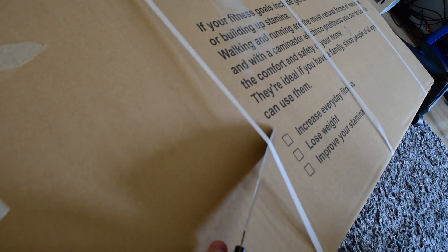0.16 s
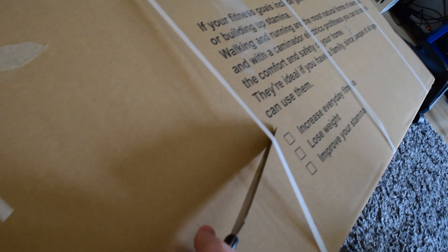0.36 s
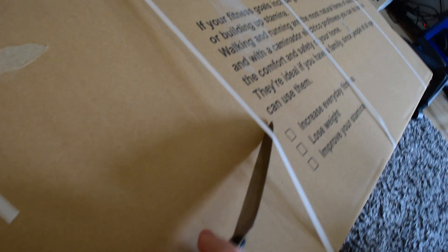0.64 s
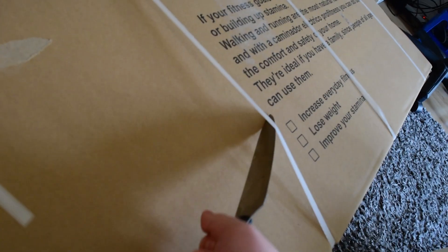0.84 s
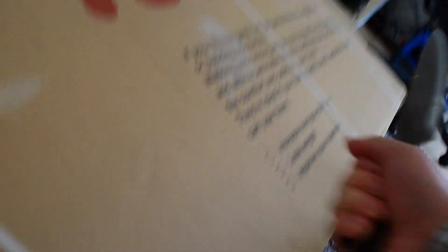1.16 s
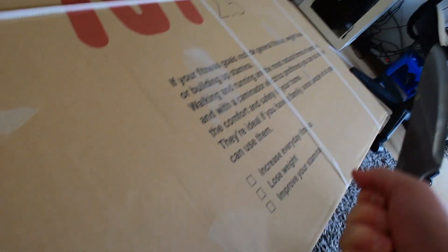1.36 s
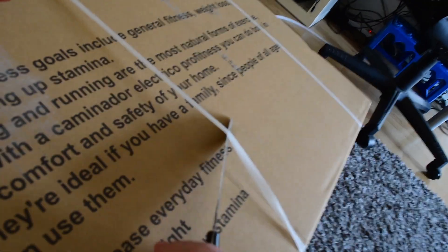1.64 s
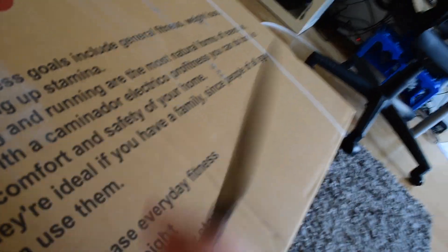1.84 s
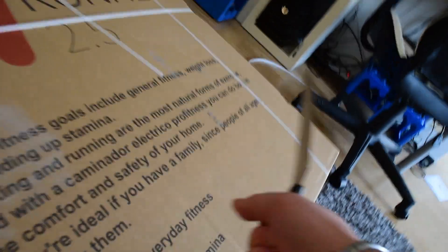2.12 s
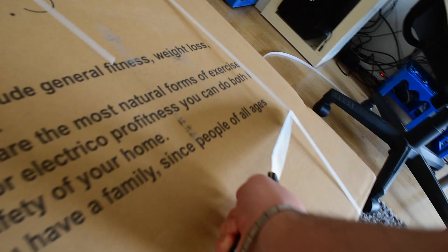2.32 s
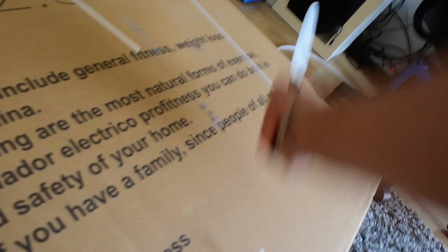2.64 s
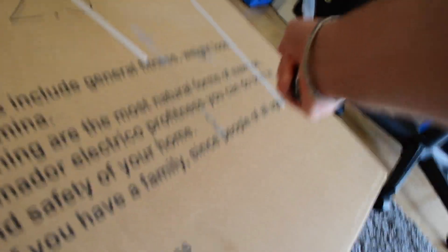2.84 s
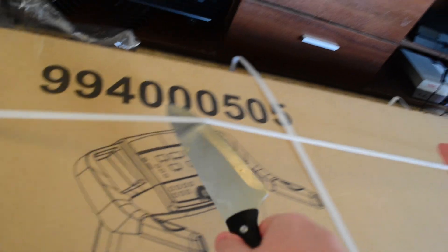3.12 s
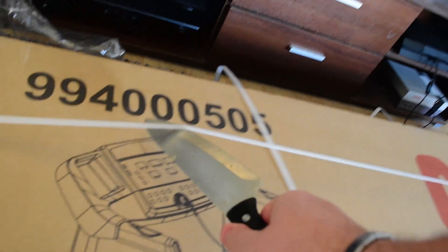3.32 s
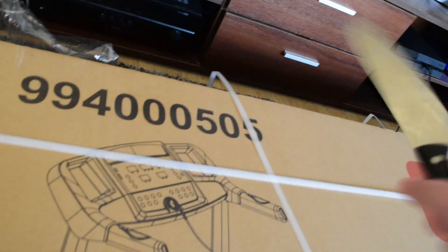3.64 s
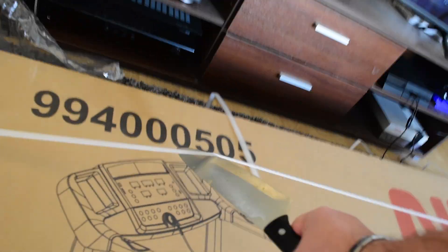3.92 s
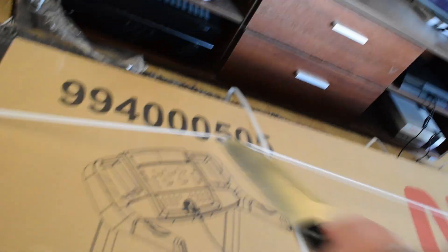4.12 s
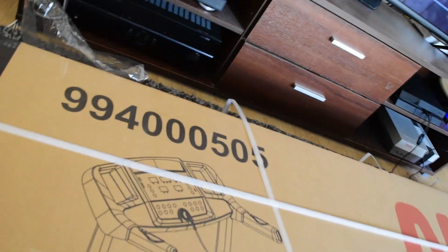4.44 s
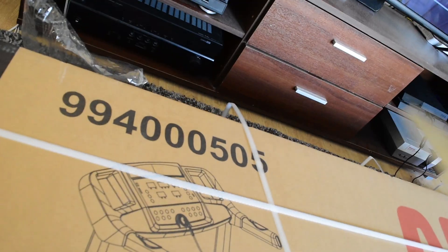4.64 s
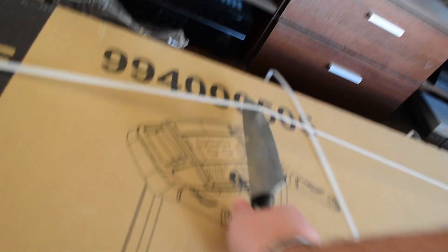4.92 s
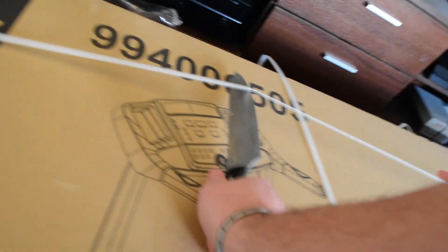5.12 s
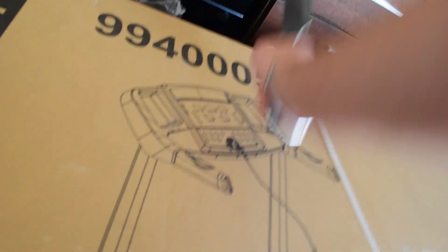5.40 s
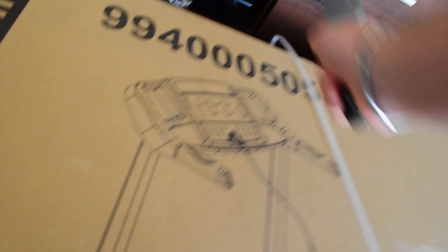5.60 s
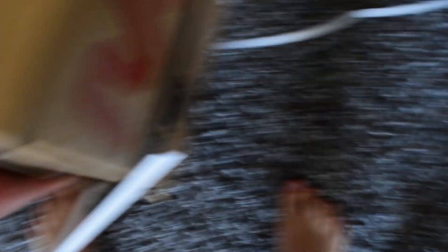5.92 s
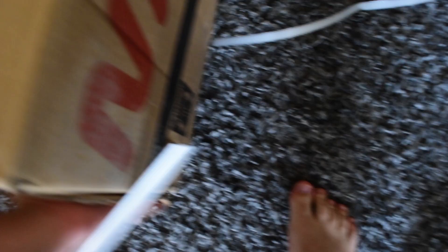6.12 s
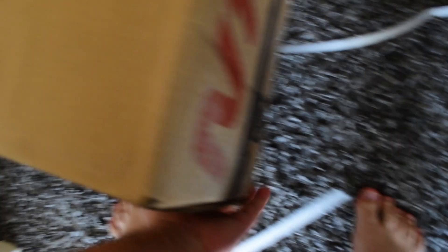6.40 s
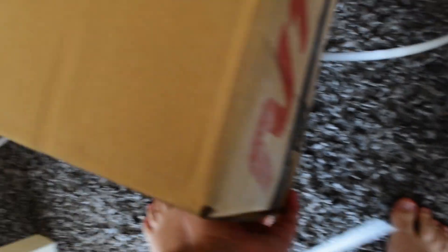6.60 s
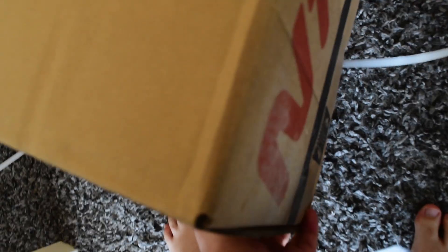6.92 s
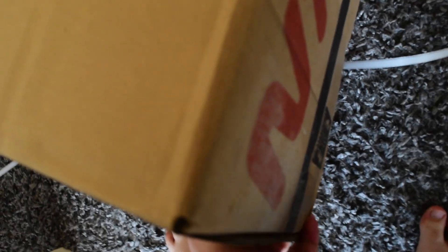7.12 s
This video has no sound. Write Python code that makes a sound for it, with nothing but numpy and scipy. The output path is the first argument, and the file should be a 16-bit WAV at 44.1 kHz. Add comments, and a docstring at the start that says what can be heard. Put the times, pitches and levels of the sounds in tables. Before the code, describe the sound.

A close microphone in a furnished room, over a faint low background, hears a knife working under tight plastic straps on a large cardboard box. From 0 to 0.95 s the blade creaks and rasps softly, with tiny ticks and a short strap hum. At 0.98 s a strap bursts: bright crack, whipping hiss and hollow drumming. Brief scrapes lead to thuds at 1.76 and a sharp snap at 1.85. Creaking resumes around 2.25, then a double crack at 2.6 with a faint steely ring. After a quieter gap, scraping at 3.4 leads to a hard snap at 3.55, and another pair at 4.13-4.2. Around 4.9-5.6 the earlier scrape, thuds and snap recur, at about 5.25. A dull handling thump comes near 6.1; from 5.9 to the end, loose strap rustles and scrapes unevenly over cardboard, with small knocks around 7.05 and 7.2.

```python
"""Cutting straps off a cardboard box

A knife is worked under tight plastic straps on a big cardboard box. The blade scrapes and ticks, made of shaped
noise and irregular slips; straps or panels hum briefly. Each bursting strap cracks, whips and drums the box, whose
panels are a bank of resonances. Loose strap is dragged away, a furnished room answers with dying noise, and a
close microphone with a fast compressor picks it all up. One cut is spliced in a second time."""
import sys
import numpy as np
from scipy import signal
from scipy.fft import rfft, irfft, next_fast_len
from scipy.io import wavfile

SR = 44100
rng = np.random.default_rng(int(sys.argv[2]) if len(sys.argv) > 2 else 0)


def voltage_ratio(decibels):
    """Convert decibels (scalar or array-like) to amplitude ratios, 20 dB per decade."""
    exponent = np.asarray(decibels, float) / 20
    return 10 ** exponent


def pcm_store(signal):
    """Save signal as 16-bit PCM."""
    levels = np.round(np.clip(np.atleast_2d(signal), -1, 1) * 32767)
    wavfile.write(sys.argv[1], SR, levels.astype(np.int16).T)


N = 320166  # length of the scene in samples

# colour of a sharp crack or tick: (frequency [Hz], level [dB per Hz])
CRACK_COLOUR = [(290, -40.5), (500, -4), (4340, 2.5), (5710, -1), (8090, 1.5), (10500, -6), (13400, -3),
                (16000, -8.5)]


def unit(x):
    """Scale to rms 1."""
    return x / np.sqrt(np.mean(x ** 2) + 1e-20)


def along(points, hz):
    """Read a curve of (frequency [Hz], value) points on a log frequency axis."""
    f, v = np.transpose(points)
    return np.interp(np.log(hz + 1), np.log(f + 1), v)


def filtered(x, response):
    """Multiply the spectrum of x by a response, given as a function of frequency."""
    m = next_fast_len(len(x) + 8192)
    hz = np.fft.rfftfreq(m, 1 / SR)
    return irfft(rfft(x, m) * response(hz), m)[:len(x)]


def noise(colour, size, tilt_db=0):
    """Coloured noise of rms 1; a positive tilt_db makes it brighter, a negative one duller."""
    def response(hz):
        return voltage_ratio(along(colour, hz) + tilt_db * np.log2(hz / 2000 + 0.048))
    return unit(filtered(rng.standard_normal(size), response))


def add(out, start, x):
    """Mix x in at start seconds."""
    out[round(start * SR):][:len(x)] += x


def slips(rate, spread_db, size=N):
    """Stick-slip: sudden small releases at random moments, about rate per second, of uneven size."""
    hit = rng.random(size) < rate / SR
    strength = voltage_ratio(spread_db * np.minimum(rng.exponential(size=size), 3))
    return hit * strength * rng.choice([-1, 1], size)


def grit(rate, spread_db, life, share, size=N):
    """Envelope of rms 1: steady contact plus short spurts that fade after each slip, over life seconds."""
    pole = np.exp(-1 / (life * SR))
    spurts = signal.lfilter([1], [1, -pole], abs(slips(rate, spread_db, size)))
    return unit(1 + share * unit(spurts))


def friction(levels, body, rasp_colour, fizz_colour, rough):
    """A low body sound; the same rough contact hisses in a mid band and crackles in a high band."""
    low, mid, high = levels
    rasp = unit(rough ** 0.96) * noise(rasp_colour, N)
    fizz = rough * noise(fizz_colour, N)
    return low * unit(body) + mid * rasp + high * fizz


def box(x):
    """The cardboard panels ring at their resonances."""
    # (pitch [Hz], width [Hz], level [dB])
    panels = [(65, 52, -1), (111, 170, -6.5), (115.6, 15, 6.5), (188, 100, -4), (284.4, 57, 1.5),
              (330, 38, 2.5), (404, 92, -5.5), (540, 76, -6), (663, 90, -10), (1130, 345, -31.5)]

    def response(hz):
        total = 0
        for k, (centre, width, db) in enumerate(panels):
            damping = 1j * hz * width
            sign = (-1) ** k  # every second resonance is flipped
            total = total + sign * voltage_ratio(db) * damping / (centre ** 2 - hz ** 2 + damping)
        return total
    return filtered(x, response)


def quiet_air():
    """The faint steady background: coloured noise at one level."""
    # (frequency [Hz], level [dB per Hz])
    colour = [(47, -33.5), (80, -11.5), (123, 2), (270, -11.5), (522, -17), (682, -29), (1260, -25.5),
              (3000, -34), (11000, -42), (14300, -74.5), (22000, -120)]
    return voltage_ratio(-53.5) * noise(colour, N)


def handling():
    """Low rumble of handling: deep noise whose level swells and sinks."""
    # level of the rumble: (time [s], level [dB])
    levels = [
        [(0, -53), (1.1, -37.5), (1.45, -44), (2.79, -41), (3.27, -47.5), (4.23, -34), (4.7, -50), (5.64, -49),
         (6.104, -24), (6.3, -45.5), (7.26, -32)],
    ][0]
    # (frequency [Hz], level [dB per Hz])
    colour = [(15, -51), (25, 7), (45, 9), (70, 0), (110, -18.5), (300, -102)]
    level_db = np.interp(np.arange(N) / SR, *np.transpose(levels))
    return voltage_ratio(level_db) * noise(colour, N)


def swell(start, length, db, peak, fall_db, release_s, attack_s=0.024):
    """Gain of one stroke: a quick start, an arch in dB with its top at the share peak, then a dying tail."""
    t = np.arange(N) / SR - start
    u = np.clip(t / length, 0, 1) - peak
    away = np.where(u < 0, -u / peak, u / (1 - peak))  # 0 at the top of the arch, 1 at either end
    tail_db = -60 * np.maximum(t - length, 0) / release_s
    return np.clip(1 + t / attack_s, 0, 1) * voltage_ratio(db - fall_db * away ** 2 + tail_db)


def stroking():
    """Gains of creak, rasp and fizz over all blade strokes; the fizz stops soon after the blade."""
    # blade strokes under the strap:
    # (start [s], length [s], creak level [dB], hiss level [dB], fizz level over the hiss [dB])
    strokes = [(-0.04, 0.064, -26.5, -44, -12), (0.182, 0.44, -29, -47.5, -6.5),
               (0.46, 0.21, -43, -44.5, -5), (0.729, 0.115, -42, -46, -4.5), (0.84, 0.14, -37, -46.5, -8),
               (1.382, 0.052, -35.5, -39, -6), (1.507, 0.12, -36, -45, -4.5),
               (1.656, 0.26, -47, -55.5, 5.5), (2.25, 0.19, -36.5, -41.5, -10.5),
               (2.52, 0.047, -30.5, -38.5, -7.5), (2.932, 0.11, -49.5, -54.5, 2),
               (3.184, 0.11, -56, -66.5, -19), (3.399, 0.13, -33.5, -42.5, -17.5),
               (3.539, 0.027, -21.5, -26, -5), (3.881, 0.25, -33, -40.5, -19),
               (4.802, 0.087, -47.5, -60, -8), (5.637, 0.41, -46.5, -53, -5)]
    linger_s, fizz_stop_s = 0.44, 0.05  # time to die by 60 dB once the blade stops
    total = np.zeros((3, N))
    for start, length, creak_db, hiss_db, bright_db in strokes:
        total[0] += swell(start, length, creak_db, 0.18, 9.5, linger_s)
        total[1] += swell(start, length, hiss_db, 0.56, 9, linger_s)
        total[2] += swell(start, length, hiss_db + bright_db, 0.92, 8.5, fizz_stop_s)
    return total


def short_hums(rate, life):
    """Short hums of a strap, taut or dragged, or of the box panel; each sinks slightly in pitch."""
    # (start [s], length [s], level [dB], middle pitch [Hz])
    hums = [(-0.04, 0.083, -37, 300), (0.191, 0.47, -30, 322), (0.746, 0.22, -54, 330),
            (1.483, 0.13, -29.5, 325), (2.277, 0.15, -25.5, 341), (2.532, 0.05, -25.5, 390),
            (3.424, 0.089, -26, 126.3), (3.892, 0.1, -27.5, 123), (4.129, 0.017, -13.5, 565),
            (5.836, 0.032, -28.5, 150), (6.243, 0.067, -44, 462), (6.613, 0.56, -41.5, 420.5),
            (7.058, 0.2, -39.5, 440)]
    sag = 0.07  # share of the pitch lost over each hum
    knots, level = [], np.zeros(N)
    for start, length, db, hz in hums:
        knots.append((start, hz * (1 + sag * 0.5)))
        knots.append((start + length, hz * (1 - sag * 0.5)))
        level += swell(start, length, db, peak=0.15, fall_db=5.5, release_s=0.16, attack_s=0.0037)
    pitch = np.interp(np.arange(N) / SR, *np.transpose(knots))
    turn = np.exp(2j * np.pi * np.cumsum(pitch) / SR)
    pole = np.exp(-1 / (life * SR))
    fade = np.convolve([1, -pole], [1, -pole ** 4])  # each random kick rises fast and dies over life seconds
    swing = signal.lfilter([1], fade, slips(rate, 3.1) * turn.conj())
    return level * unit((swing * turn).imag)


def blade_rub():
    """The blade rubs under the strap: slips creak through the box and rough contact hisses and crackles."""
    # rasp and fizz: (frequency [Hz], level [dB per Hz])
    rasp_colour = [(500, -28), (800, 0), (1360, 0), (1750, -5), (2400, -3), (3300, -15.5), (4300, -10),
                   (5000, -19.5), (7000, -57.5)]
    fizz_colour = [(4500, -33), (5500, -8), (6400, -3), (7400, -5.5), (8300, -5.5), (10000, -10.5),
                   (11500, -16), (12800, -12.5), (16000, -15.5)]
    teeth = grit(70, 3, 0.0015, 0.45)
    creak = box(slips(400, 7.3))
    return friction(stroking(), creak, rasp_colour, fizz_colour, teeth)


def taps():
    """Each contact: a short tick, a dull crunch of card and a push into the box."""
    # blade and strap contacts:
    # (time [s], tick level [dB], knock level [dB], knock pitch [Hz], tick brightness [dB per octave])
    contacts = [(0.2227, -47, -18, 346, 3), (0.3696, -37, -19.5, 313, 1), (0.3944, -30.5, -12.5, 308, -0.5),
                (0.5092, -38, -21, 390, 9), (0.9762, -2, -6, 151.8, -1.5), (1.1053, -15.5, -19, 340, 2),
                (1.3709, -11.5, -13, 1704, -5.5), (1.634, -42, -58, 339, 7.5), (1.7192, -30, -64.5, 345, 9),
                (1.7607, -6.5, 5, 218, -4.5), (1.8028, -17, -0.5, 153, 1.5),
                (1.8126, -20.5, -7.5, 148, 2.5), (1.8327, -8, -11.5, 273, 6.5), (1.8595, 9, -7, 492, 3.5),
                (2.2436, -25, -36.5, 242, -1.5), (2.2695, -25.5, -22, 343, 2), (2.3245, -18, -22, 289, -3),
                (2.3351, -16, -21, 318, -2), (2.396, -20.5, -11.5, 304, -3.5), (2.52, -18, -21, 370, -7),
                (2.577, -5.5, -7.5, 170, -3.5), (2.5987, -5, -2, 1610, -4), (2.617, -6, 2, 233, 0),
                (2.9285, -27.5, -36, 164, 1.5), (2.9527, -33, -39, 345, 2), (2.9786, -31.5, -41, 215, 3),
                (3.4201, -9, -17.5, 147.4, -9.5), (3.4625, -23, -9.5, 519, 2),
                (3.4995, -21.5, -18.5, 152, 2), (3.5569, 6.5, 1, 321.6, 1.5), (3.89, -38, -28, 595, -2),
                (3.9401, -34, -23.5, 720, -5), (4.132, -1.5, -4.5, 553, 5),
                (4.162, -11.5, -15.5, 146.7, -5), (4.2035, 9, -16.5, 352, 0), (5.6458, -24, -27, 248, 0.5),
                (5.7022, -32.5, -29.5, 222, -3), (5.8394, -37, -23, 143, -1), (6.2915, -20, -21.5, 453, 21),
                (6.4286, -25.5, -35.5, 233, 21), (7.0187, -24.5, -25, 4450, 1), (7.062, -18, -12, 191, -7),
                (7.073, -15, -12.5, 395, -5), (7.076, -30, -12, 110.7, -5), (7.2059, -24, -36, 468, -4),
                (7.2268, -14.5, -18, 1660, -8), (7.246, -37, -47, 400, -2)]
    # colour of the crunch: (frequency [Hz], level [dB per Hz])
    thud = [(60, -25), (150, 4.5), (400, 0.5), (1200, -12.5), (3000, -23.5), (8000, -71.5)]
    out, push, t = np.zeros(N + SR), np.zeros(N + SR), np.arange(SR // 5) / SR
    for start, tick_db, knock_db, hz, tilt_db in contacts:
        tick = voltage_ratio(tick_db - 60 * t / 0.022) * (1 - np.exp(-t / 0.0014))
        tick = tick * noise(CRACK_COLOUR, len(t), tilt_db)
        crunch = voltage_ratio(knock_db - 60 * t / 0.05) * (1 - np.exp(-t / 0.0063)) * noise(thud, len(t))
        spring_s = 4 / hz + 0.02  # the struck spot gives and springs back
        dent = voltage_ratio(knock_db + 6.5 - 60 * t / spring_s) * np.sin(2 * np.pi * hz * t)
        add(out, start, tick + crunch + 0.48 * dent)
        add(push, start, dent)
    return out[:N] + 0.36 * box(push[:N])


def bursts():
    """A crack, then the freed strap lashes the box: hiss, drumming and a sizzle that stops when the end lies still."""
    # straps bursting or slipping loose:
    # (time [s], crack level [dB], whip level [dB], drum level [dB], sizzle level [dB], lashing time [s])
    loose = [(0.9777, 8, -6.5, -5.5, -29, 0.12), (1.8514, -3, -6.5, -8.5, -28.5, 0.074),
             (2.5787, -16, -27, -11.5, -42, 0.049), (2.599, 1, -10, -17.5, -33.5, 0.073),
             (3.551, 0.5, -6.5, -15, -23, 0.08), (4.133, -12, -18, -11, -34.5, 0.087),
             (4.1973, 0, -4.5, -12.5, -20.5, 0.087)]
    # whip, sizzle, and boom of the whole box breathing: (frequency [Hz], level [dB per Hz])
    whip_colour = [(240, -8.5), (400, 5), (579, -1.5), (1090, 3), (3020, -7), (4440, -6.5), (7280, -12),
                   (11000, -55.5), (15000, -78.5), (16000, -62)]
    sizzle_colour = [(1500, -31.5), (4000, -6), (8000, -0.5), (12000, -6.5), (15500, -6.5), (16500, -30)]
    boom_colour = [(35, -30), (60, -7.5), (90, -1), (122, 0), (150, -15.5), (300, -64)]
    out, t = np.zeros(N + SR), np.arange(SR // 2) / SR
    size = len(t)
    for start, crack_db, whip_db, drum_db, sizzle_db, lash_s in loose:
        crack = voltage_ratio(crack_db + 5 - 60 * t / 0.0092) * (1 - np.exp(-t / 0.0019))
        crack = crack * noise(CRACK_COLOUR, size)
        whip = voltage_ratio(whip_db) * grit(80, 4.6, 0.0037, 0.27, size) * noise(whip_colour, size)
        dull = filtered(whip, lambda hz: 1 / (1 + (hz / 5000) ** 4))
        whip = dull + voltage_ratio(-60 * t / 0.5) * (whip - dull)  # its treble dies first
        panels = unit(box(slips(500, 4.9, size)))
        drum = voltage_ratio(drum_db) * (panels + 0.73 * noise(boom_colour, size))
        sizzle = voltage_ratio(sizzle_db) * grit(370, 4.3, 0.0017, 0.9, size) * noise(sizzle_colour, size)
        sizzle = sizzle / (1 + np.exp((t - lash_s) / 0.013))
        fade = voltage_ratio(-60 * t / 0.35) * (1 - np.exp(-t / 0.012))
        add(out, start, crack + fade * (whip + drum) + sizzle)
    return out[:N]


def clinks():
    """The steel blade rings faintly at its own pitches when it is flicked."""
    # flicks of the blade: (time [s], level [dB])
    flicks = [(2.6003, -33), (3.4182, -40), (3.4632, -43.5), (3.502, -41), (3.5565, -21.5)]
    # steel ringing: (pitch [Hz], level [dB], time to die by 60 dB [s])
    steel = [(7260, -3, 0.06), (8400, 0.5, 0.053), (9730, -4, 0.07)]
    out, t = np.zeros(N + SR), np.arange(SR // 5) / SR
    scatter_db = rng.normal(0, 2, (len(flicks), len(steel)))  # no two flicks ring quite alike
    for (start, db), chances in zip(flicks, scatter_db):
        for (hz, mode_db, t60), chance_db in zip(steel, chances):
            level = voltage_ratio(db + mode_db + chance_db - 60 * t / t60)
            add(out, start, level * np.sin(2 * np.pi * hz * t))
    return out[:N]


def pulling():
    """Gains of body, rasp and fizz of the dragged strap: harder pulls are brighter."""
    # strength of the pull on the strap: (time [s], level [dB])
    pulls = [
        [(5.87, -52), (5.914, -37.5), (6.026, -35), (6.144, -42), (6.19, -36), (6.238, -48), (6.296, -38.5),
         (6.354, -50), (6.52, -52), (6.572, -39.5), (6.65, -41.5), (6.834, -36.5), (6.904, -41.5),
         (7.09, -40.5), (7.15, -47.5), (7.21, -42), (7.26, -42.5)],
    ][0]
    t = np.arange(N) / SR
    db = np.interp(t, *np.transpose(pulls))
    inside = np.minimum(t - pulls[0][0], pulls[-1][0] - t)
    on = np.clip(1 + inside / 0.015, 0, 1)  # fades in and out at the ends
    over_db = db + 40  # above a firm pull of -40 dB
    return on * voltage_ratio([-36.5 + 0.89 * over_db, db, -43.5 + 1.5 * over_db])


def strap_drag():
    """Loose strap dragged over cardboard: uneven pressure shapes a low body, a rasp and a fizz."""
    # body, rasp and fizz: (frequency [Hz], level [dB per Hz])
    body_colour = [(47, -24), (80, -3.5), (156, -4), (200, -10), (235, -5), (302, -15), (396, -8),
                   (800, -20.5), (1040, -20.5), (1760, -120)]
    rasp_colour = [(410, -19), (700, -5), (1310, 10), (1430, 8.5), (2200, 5.5), (3680, 4.5), (4800, 5),
                   (6240, -14), (10600, -120)]
    fizz_colour = [(2820, -2), (4800, 7), (5610, 10), (7400, 9.5), (10200, 3.5), (11200, 2), (12100, 7),
                   (13500, 1), (15100, 1.5), (16000, -39)]
    lumps = grit(60, 3, 0.015, 0.4)  # uneven pressure along the strap
    rough = unit(lumps * grit(200, 4.7, 0.0022, 0.25))
    return friction(pulling(), lumps * noise(body_colour, N), rasp_colour, fizz_colour, rough)


def room(x):
    """Reverberation dying band by band, with a new pattern every third of a second."""
    # (frequency [Hz], time to die by 60 dB [s])
    decay = [(100, 0.55), (500, 0.47), (2000, 0.51), (6000, 0.42), (15000, 0.19)]
    out, step = np.zeros(N + 2 * SR), SR // 3
    for i in range(0, N, step):
        hz, t, bands = signal.stft(rng.standard_normal(SR * 3 // 5), SR, nperseg=256)
        dying = bands * voltage_ratio(-60 * t / along(decay, hz)[:, None])
        tail = signal.istft(dying, SR, nperseg=256)[1]
        echo = signal.fftconvolve(x[i:i + step], tail / np.linalg.norm(tail))
        add(out, i / SR + 0.006, echo)  # the room answers 6 ms later
    return out[:N]


def scene():
    """Everything near the box, its room, and the quiet air."""
    background = quiet_air() + handling()
    rub = blade_rub() + short_hums(250, life=0.0063)
    near = rub + taps() + bursts() + clinks() + strap_drag()
    return (near + room(voltage_ratio(-12) * near) + background)[None]


def compress(x, top_db, slope, attack, release_db):
    """Gain falls when the short-time level passes top_db; the held level then sinks release_db a second."""
    pole = np.exp(-1 / (attack * SR))
    level_db = 10 * np.log10(signal.lfilter([1 - pole], [1, -pole], x ** 2) + 1e-12)
    climb = release_db * np.arange(N) / SR
    held_db = np.maximum.accumulate(level_db + climb) - climb  # follows rises at once, sinks steadily
    return x * voltage_ratio(-slope * np.maximum(held_db - top_db, 0))


def soft_clip(x):
    """Peaks are rounded off towards a ceiling of 0.8, then the very top of the treble is cut."""
    rounded = x / (1 + abs(x / 0.8) ** 4) ** (1 / 4)
    return filtered(rounded, lambda hz: 1 / (1 + (hz / 15900) ** 60))


def repeat_cut(x):
    """One stretch is spliced in again later, in place of what was there, with 3 ms crossfades."""
    # (stretch start [s], stretch end [s], heard again after [s])
    start, stop, delay = (1.475, 2.243, 3.4)
    t = np.arange(N) / SR - delay
    again = np.clip(np.minimum(t - start, stop - t) / 0.003, 0, 1)
    return (1 - again) * x + again * np.roll(x, round(delay * SR))


def top_cut(x):
    """Nothing passes above the cut-off."""
    return signal.sosfilt(signal.butter(12, 16970, fs=SR, output="sos"), x)


def record(dry):
    """Fast compressor, soft clipping and the repeated cut make the finished mix."""
    x = compress(dry[0], top_db=-10, slope=0.68, attack=0.0013, release_db=187)
    mix = repeat_cut(soft_clip(x))
    return top_cut(mix[None])


dry = scene()
out = record(dry)
pcm_store(out)
```